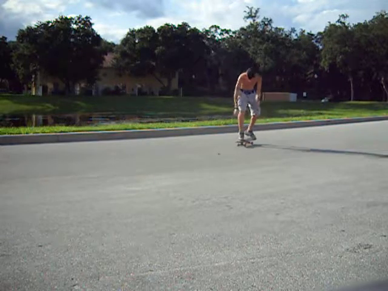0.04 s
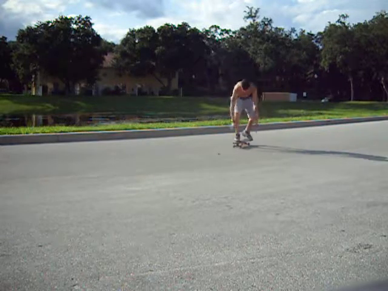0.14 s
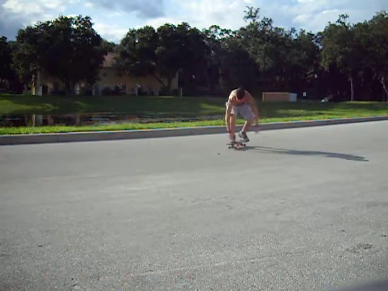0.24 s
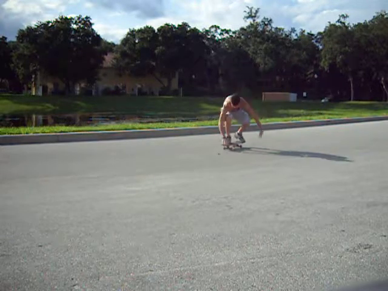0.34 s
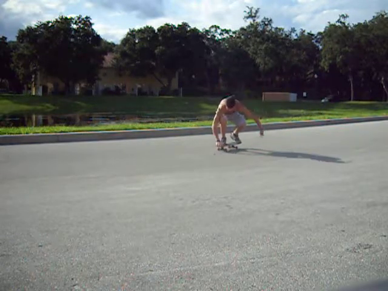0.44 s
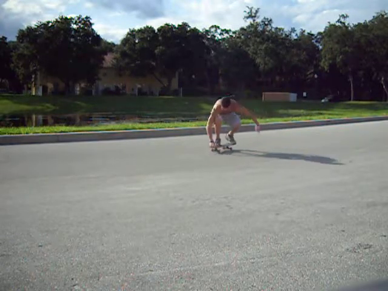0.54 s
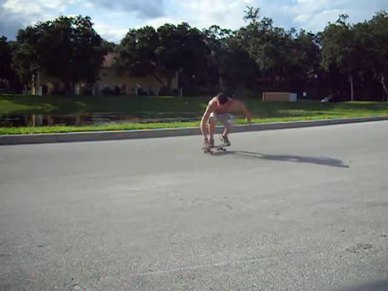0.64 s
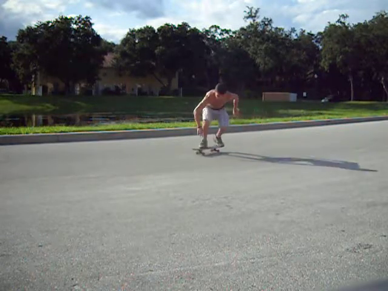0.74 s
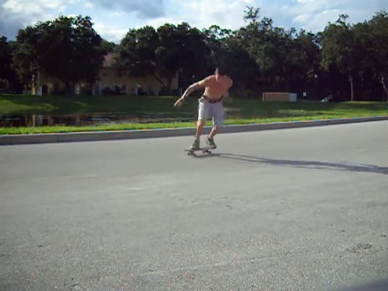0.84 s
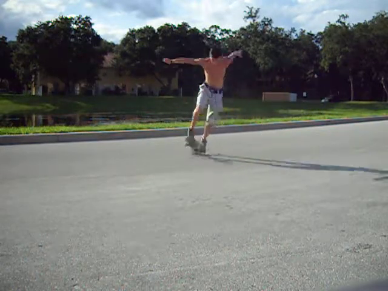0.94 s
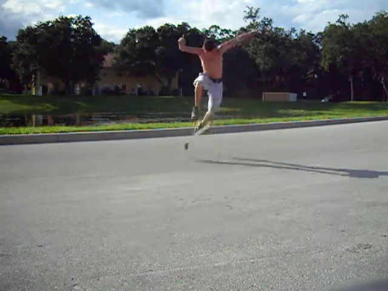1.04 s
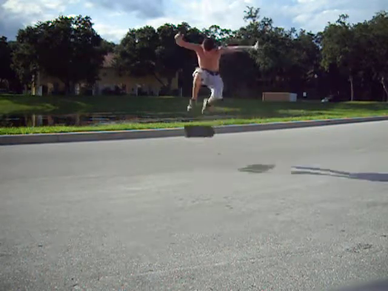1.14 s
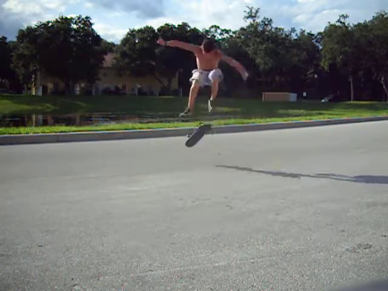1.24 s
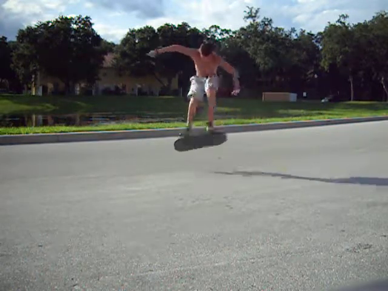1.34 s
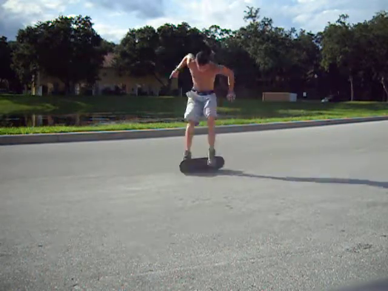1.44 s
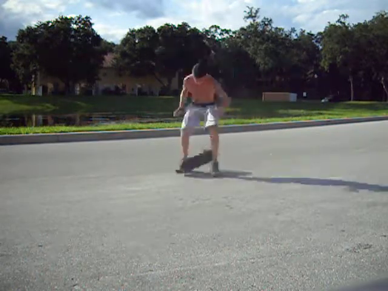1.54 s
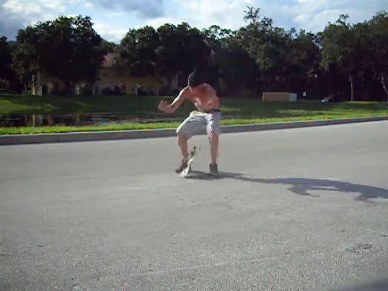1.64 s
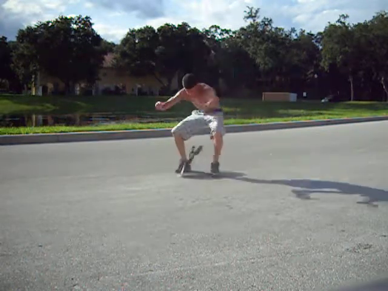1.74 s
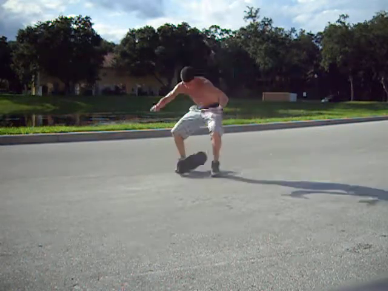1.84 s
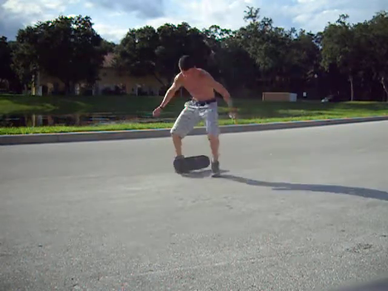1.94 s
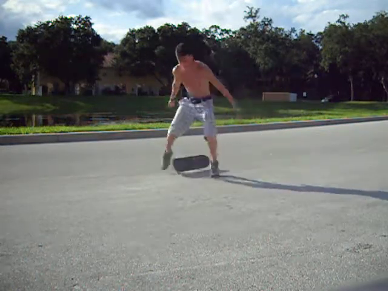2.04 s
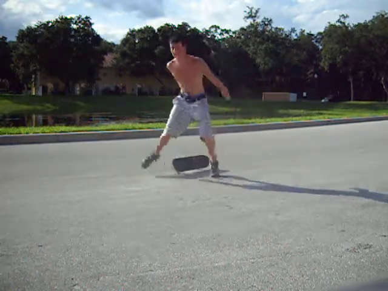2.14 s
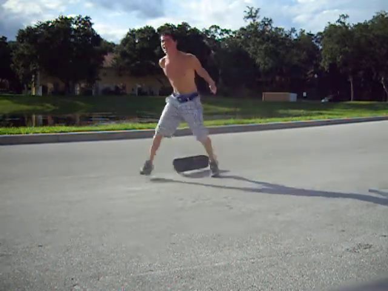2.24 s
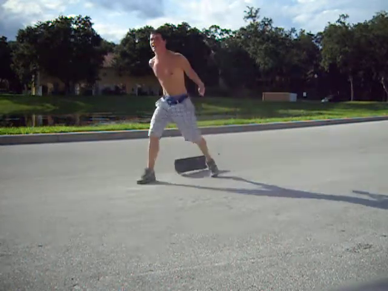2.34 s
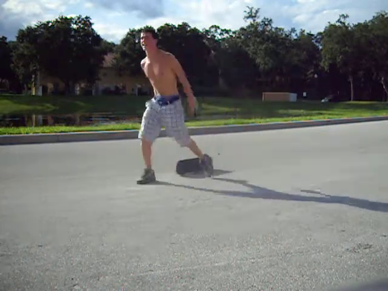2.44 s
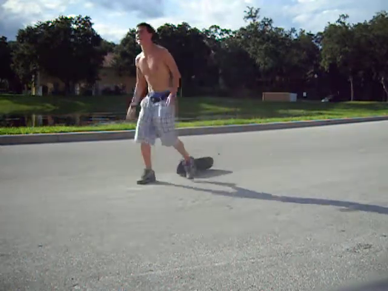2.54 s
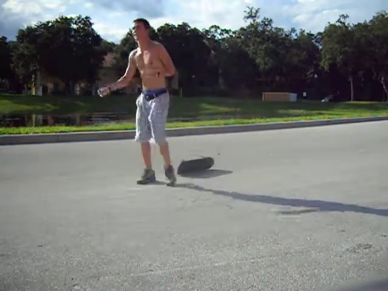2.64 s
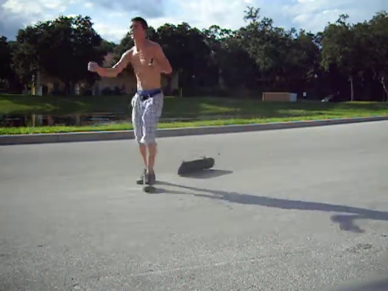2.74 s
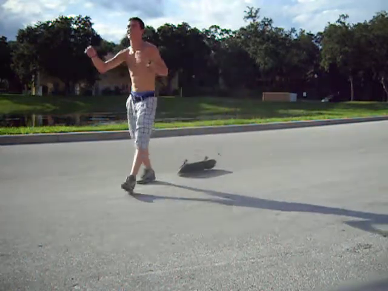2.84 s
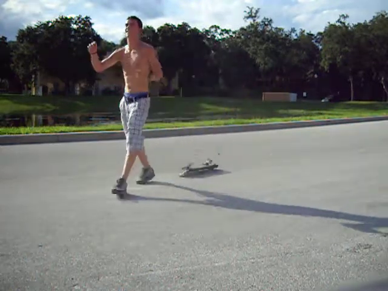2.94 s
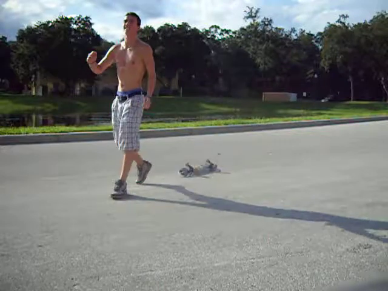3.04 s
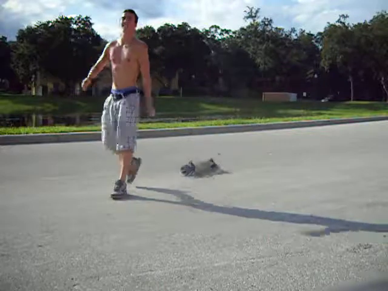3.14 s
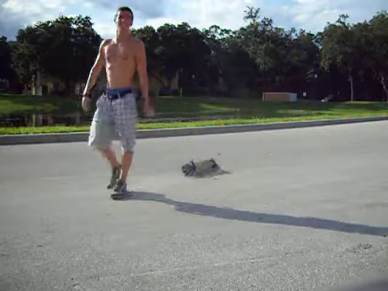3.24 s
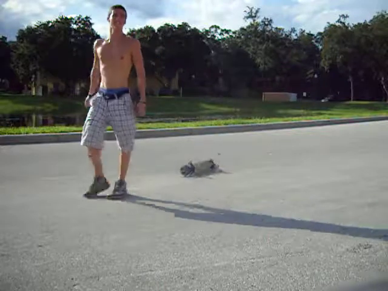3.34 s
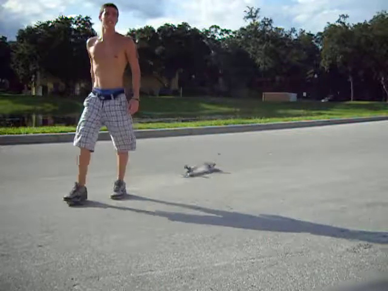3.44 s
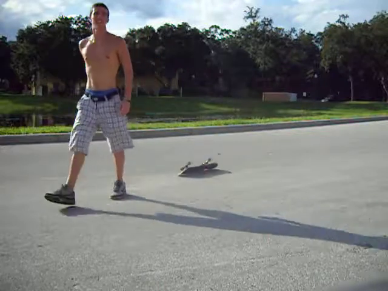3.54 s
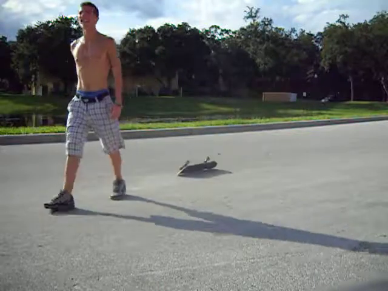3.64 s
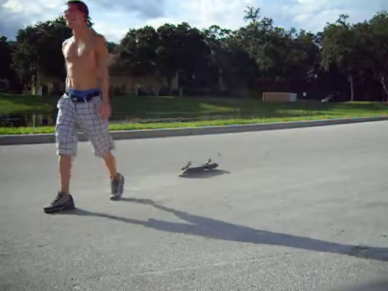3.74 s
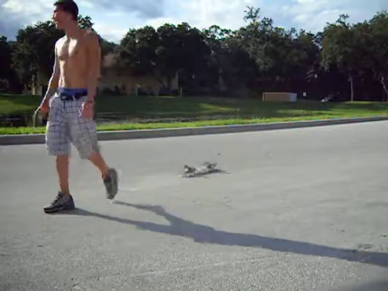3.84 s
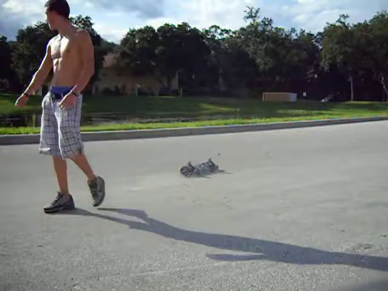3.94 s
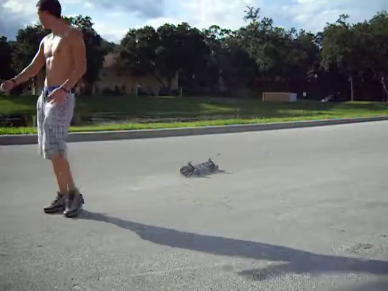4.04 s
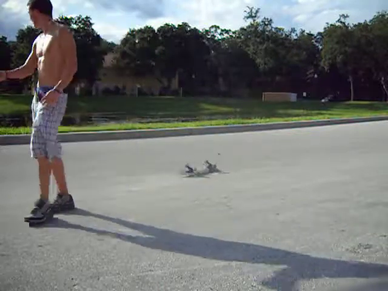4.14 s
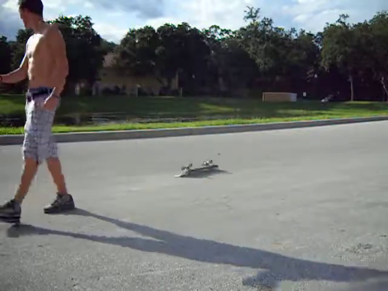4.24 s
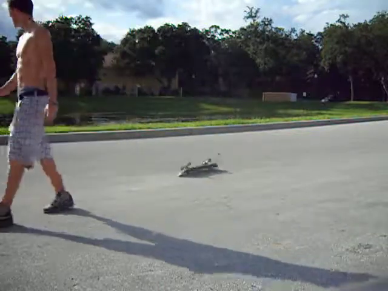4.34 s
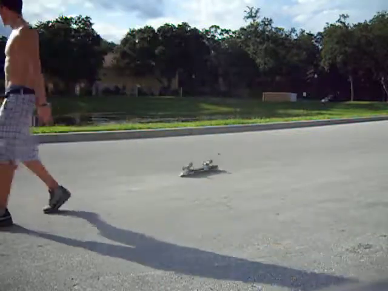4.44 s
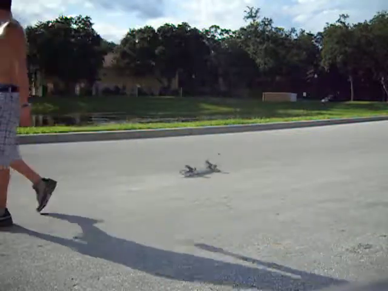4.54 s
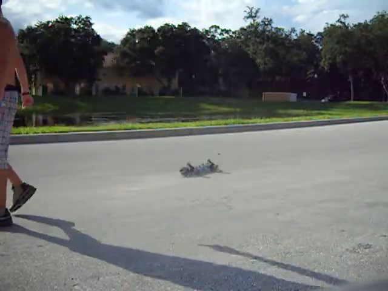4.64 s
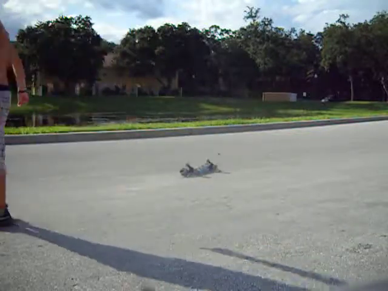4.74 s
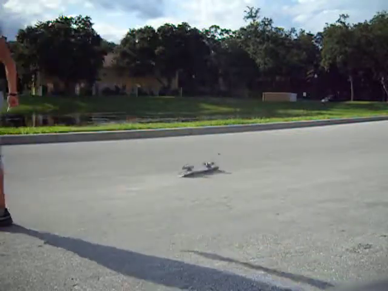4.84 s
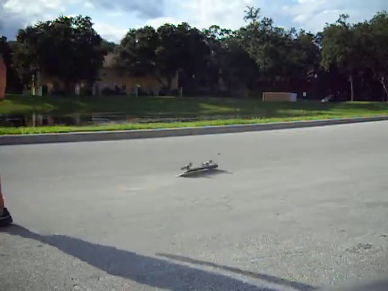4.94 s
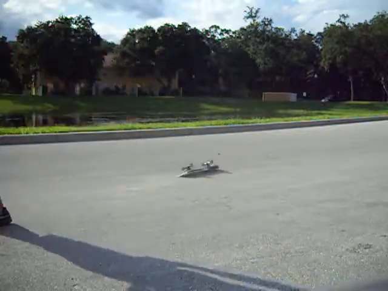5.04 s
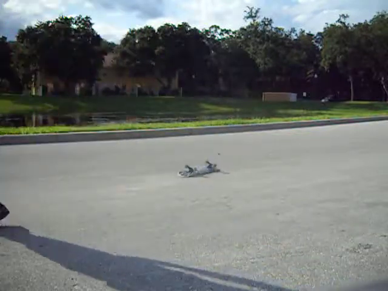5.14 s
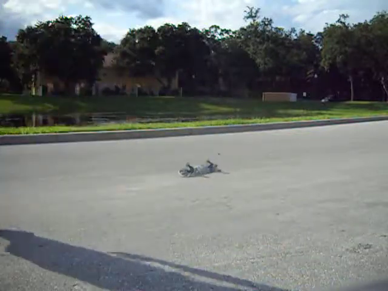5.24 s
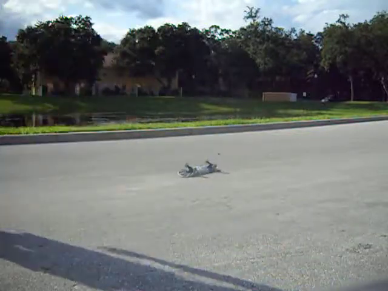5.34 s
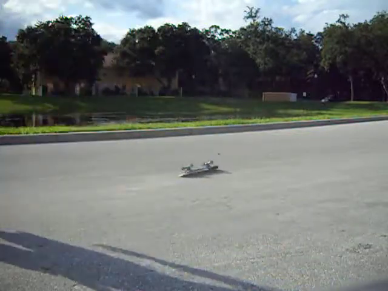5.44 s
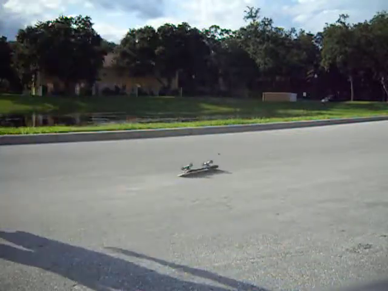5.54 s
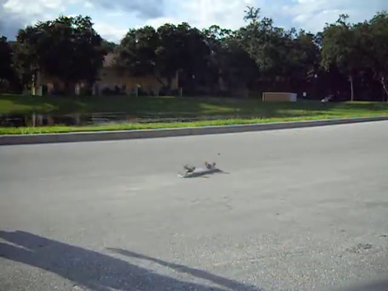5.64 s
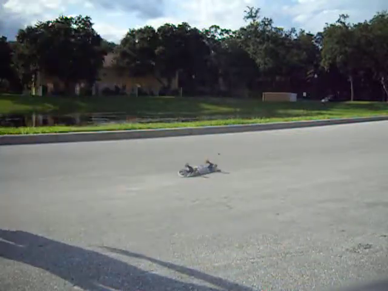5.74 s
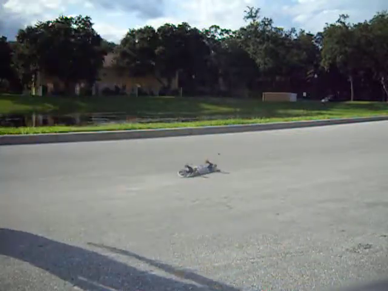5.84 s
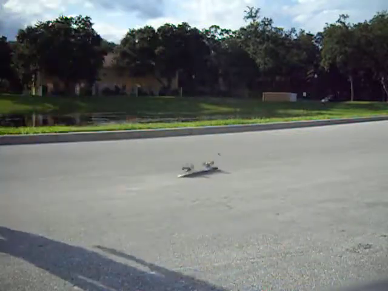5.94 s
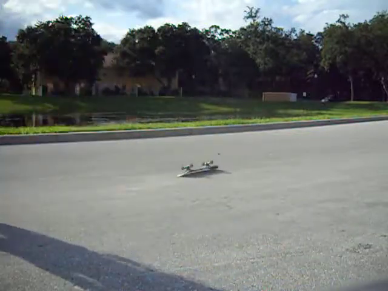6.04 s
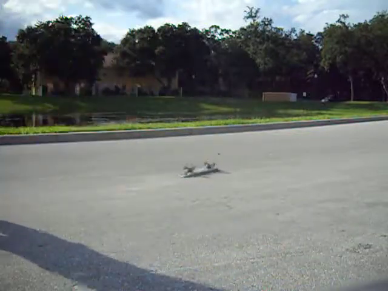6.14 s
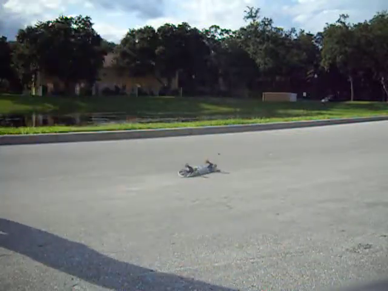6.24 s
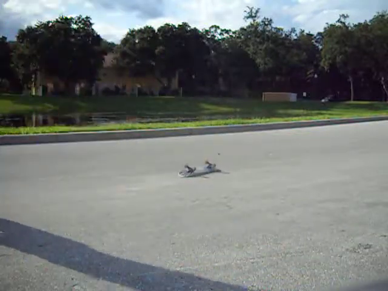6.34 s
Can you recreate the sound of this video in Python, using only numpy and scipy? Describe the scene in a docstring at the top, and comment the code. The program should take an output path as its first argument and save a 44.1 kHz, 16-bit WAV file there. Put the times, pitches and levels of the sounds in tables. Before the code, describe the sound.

Skateboard wheels roll over rough asphalt from the start, growing louder, with a few light clicks. At about 1 second the tail pops with a sharp wooden crack and the rolling stops. At 1.5 seconds the rider lands on the deck in a cluster of hard knocks, the loudest moment, overloading the microphone. The board scrapes, slaps down again near 2 seconds and rasps to rest by about 2.3. Its free wheels whirr faintly, fading out by 5 seconds. From 2.4 seconds trainers step and scuff on the gritty road, much softer than the crash, thinning out toward 6 seconds. The impacts have a faint outdoor echo. Underneath lie a quiet street wash and light wind rumble on a small microphone with little treble; a low drone like a distant engine rises slightly at about 4.7 seconds.

```python
"""A quiet suburban street. A skateboard rolls up over rough asphalt, its tail pops, and after a flip the
rider lands hard on the overturned deck, each impact exciting its modes. The board slaps down and scrapes
to rest, its wheels whirring on; he walks past in gritty trainers. Trees and houses return a faint echo.
A small camera's narrow-band microphone hears it, overloads on the big blows and catches a little wind."""
import sys
import numpy as np
from scipy import signal
from scipy.fft import rfft, irfft, next_fast_len
from scipy.io import wavfile
from scipy.ndimage import uniform_filter1d

SR = 44100
rng = np.random.default_rng(int(sys.argv[2]) if len(sys.argv) > 2 else 0)


def to_wav(s):
    """Save 16-bit WAV."""
    ch = np.atleast_2d(s).T  # columns
    pcm = np.round(np.clip(ch, -1, 1) * 32767)  # PCM
    wavfile.write(sys.argv[1], SR, pcm.astype(np.int16))


N = 281797
T = np.arange(N) / SR
SHORT = T[:SR // 3]  # time axis of one contact
TAKEOFF_S, RIDER_ON_S, RIDER_OFF_S = 1.035, 1.48, 1.63

# spectrum of sand crushed against the road: (frequency [Hz], level [dB])
GRIT_SPECTRUM = [(700, -5.5), (1200, -0.5), (1650, -7.5), (2050, 3), (2500, 2), (3100, -7), (3700, -7),
                 (4500, -15.5)]


def undb(db):
    """Decibels to amplitude ratio."""
    return 10 ** (np.asarray(db) / 20)


def unit(x):
    """Normalisation to rms 1."""
    return x / np.sqrt(np.mean(x ** 2))


def burst(x, db=0):
    """Energy normalisation: a transient gets the energy of 10 ms at this level."""
    return x * undb(db) / np.sqrt(np.sum(x ** 2) / (SR / 100))


def add(out, start_s, x):
    """Superposition of x on out, from start_s on."""
    i = int(start_s * SR)
    out[i:i + len(x)] += x[:N - i]


def butter(x, hz, kind, order=2):
    """Causal low-, high- or band-pass filtering."""
    return signal.sosfilt(signal.butter(order, hz, kind, fs=SR, output="sos"), x)


def resonate(x, hz, q):
    """Second-order resonance with gain 1 at its centre."""
    return signal.lfilter(*signal.iirpeak(hz, q, fs=SR), x)


def resonator_bank(x, modes):
    """Forced response of parallel resonances of alternating polarity, at rms 1."""
    return unit(sum((-1) ** k * undb(db) * resonate(x, hz, hz / width)
                    for k, (hz, width, db) in enumerate(modes)))


def shape(x, spectrum):
    """Zero-phase filtering by a curve of (frequency [Hz], gain [dB])."""
    hz, db = np.transpose(spectrum)
    size = next_fast_len(len(x) + SR // 20)
    f = np.arange(size // 2 + 1) * SR / size
    gain = undb(np.interp(np.log(f + 1), np.log(hz), db))
    return irfft(rfft(x, size) * gain, size)[:len(x)]


def colour(x, spectrum):
    """Spectral shaping, at rms 1."""
    return unit(shape(x, spectrum))


def wander(per_s):
    """Slow random modulation: ramps between random values, at rms 1."""
    k = int(SR / per_s)
    return unit(uniform_filter1d(np.repeat(rng.standard_normal(N // k + 1), k), k)[:N])


def grains(size, per_s, spread_db):
    """Shot noise: random tiny contacts of uneven strength."""
    hits = rng.random(size) < per_s / SR
    signs = rng.choice([-1, 1], size)
    return unit(hits * signs * undb(spread_db * np.minimum(rng.exponential(size=size), 4)))


def held(start_s, end_s, attack_s, release_s):
    """Envelope with linear attack, hold and exponential release."""
    return np.clip((T - start_s) / attack_s, 0, 1) * np.exp(-np.maximum(T - end_s, 0) / release_s)


def rise_and_decay(decay_s):
    """Double-exponential envelope of a transient."""
    return np.exp(-SHORT / decay_s) - np.exp(-4 * SHORT / decay_s)


def tone(hz, db, drift, waver_db):
    """A sinusoid under slow random frequency and amplitude modulation."""
    phase = 2 * np.pi * np.cumsum(hz * (1 + drift * wander(11))) / SR
    return np.sqrt(2) * undb(db + waver_db * wander(2.4)) * np.sin(phase)


def ambience(air_db=-46, drone_rise_s=4.65):
    """Ambient noise: a broadband wash, a faint hum and a drone like a far engine that steps up once."""
    # distant outdoor wash: (frequency [Hz], level [dB])
    air_spectrum = [(50, -17), (120, 2.5), (200, -1), (350, -4), (550, -7.5), (850, -6), (1100, -12),
                    (1500, -12.5), (2500, -16.5), (3600, -18.5), (5000, -32)]
    # partials of the hum: (frequency [Hz], level [dB])
    hum_partials = [(119, -55.5), (240, -60), (362, -63)]
    air = undb(air_db + 0.31 * wander(7)) * colour(rng.standard_normal(N), air_spectrum)
    hum = sum(tone(hz, db, drift=0.00799, waver_db=2) for hz, db in hum_partials)
    drone = tone(hz=54, db=np.where(T < drone_rise_s, -55.5, -45), drift=0.06, waver_db=1.4)
    return air + hum + drone


def wind(rumble_db=-43, gust_db=0.5):
    """Turbulence: a breeze's pressure fluctuations rumble and bump on the microphone."""
    # spectrum of the rumble: (frequency [Hz], level [dB])
    rumble_spectrum = [(15, 4), (26, 0.5), (36, 2), (51, 0.5), (70, -6.5), (100, -4), (200, -32.5)]
    # single pressure bumps: (time [s], peak level [dB], frequency [Hz])
    buffets = [(2.941, -30, 69.4), (4.718, -27.5, 30.2), (5.148, -26.5, 77), (5.399, -30, 80)]
    pressure = undb(rumble_db + gust_db * wander(1.377)) * colour(rng.standard_normal(N), rumble_spectrum)
    for time_s, db, hz in buffets:
        cycles = (T - time_s) * hz
        pressure -= undb(db) * np.cos(2 * np.pi * cycles) * np.exp(-2 * cycles ** 2)
    return pressure


def street_echo(x, scatter_db=-25, t60_s=0.76, echo_db=-27, delay_s=0.076, smear_s=0.022):
    """Reflection and scattering: trees and houses add a thin tail and one smeared echo to x."""
    # spectrum of the reflections: (frequency [Hz], level [dB])
    reflected = [(100, -7.5), (350, -2.5), (900, -0.5), (1600, -1.5), (2600, -11.5), (4000, -9.5)]
    t = T[:SR]
    tail = np.exp(-np.log(1000) * t / t60_s) * (1 - np.exp(-t / 0.0067))
    scatter = colour(rng.standard_normal(SR), reflected) * tail
    smear = (t > delay_s) * np.exp(-np.abs(t - delay_s) / smear_s)
    echo = colour(rng.standard_normal(SR), reflected) * smear
    response = (undb(scatter_db) * unit(scatter) + undb(echo_db) * unit(echo)) / np.sqrt(SR)
    return x + signal.fftconvolve(x, response)[:N]


def spinning_wheels(stop_s=5.2):
    """Free rotation: ticking balls excite the bearings' resonances, fading as friction slows the wheels."""
    # resonances of the bearings: (frequency [Hz], bandwidth [Hz], gain [dB])
    bearing_modes = [(547, 180, 3), (1956, 140, 1.5), (2460, 160, 0.5), (3570, 130, -7)]
    speed = np.clip((stop_s - T) / (stop_s - TAKEOFF_S), 0, 1)
    whirr = resonator_bank(grains(N, per_s=2700, spread_db=3.5), bearing_modes)
    return undb(-46) * speed * whirr * (T > RIDER_OFF_S)


def footsteps(onset_s=0.0031, toe_db=-7):
    """Impact and granular crushing: a rubber sole claps down, heel then forefoot, and grinds sand."""
    # footfalls, scuffs and one pebble tick:
    # (time [s], sole level [dB], grit level [dB], contact time scale [s])
    contacts = [(2.376, -41, -37, 0.011), (2.417, -34.5, -44.5, .003), (2.496, -25.5, -37.5, .016),
                (2.846, -35, -31.5, .009), (3.009, -37.5, -43, 0.0092), (3.074, -41.5, -39, .014),
                (3.127, -40, -41.5, .007), (3.164, -31.5, -39.5, .008), (3.438, -40.5, -45.5, .01),
                (3.513, -34.5, -41, 0.02), (3.599, -35.5, -43, .06), (3.905, -37, -41, .016),
                (3.954, -36, -41.5, .009), (4.081, -37, -41, .0039), (4.257, -35, -39, .015),
                (4.58, -38, -42.5, .016), (4.895, -37.5, -45.5, .012), (5.202, -43.5, -46, .008),
                (5.467, -39, -46.5, .006), (5.907, -73, -46.5, .0023), (5.986, -45.5, -49.5, .01)]
    out = np.zeros(N)
    for time_s, sole_db, grit_db, contact_s in contacts:
        sole_hz = 518 * 2 ** (-0.03 * (sole_db + 37.5))  # a heavier step flattens more rubber: lower pitch
        release = np.exp(-SHORT / (2 * contact_s) - (SHORT / (4 * contact_s)) ** 2)
        pressure = (1 - np.exp(-SHORT / onset_s)) * release
        tap = burst(signal.unit_impulse(len(SHORT)), 2) * np.exp(-contact_s / 0.01)  # brisk steps tap most
        for lag_s, part_db in [(0, 0), (1.5 * contact_s, toe_db)]:
            force = burst(pressure * grains(len(SHORT), per_s=1200, spread_db=-1)) + tap
            slap = butter(force, [300, 1050], "band")
            sole = burst(resonate(slap, sole_hz, q=3)) + burst(slap, -8)
            sand = colour(pressure * grains(len(SHORT), per_s=730, spread_db=3), GRIT_SPECTRUM)
            add(out, time_s + lag_s, burst(sole, sole_db + part_db) + burst(sand, grit_db))
    return out


def rolling_wheels(start_db=-39, nearing_db_per_s=4.5, push_s=1, push_db=10.5, lift_db_per_s=517):
    """Roughness excitation: wheels drum on asphalt, louder as they near and are pressed, silent aloft."""
    # spectrum of hard wheels on stones: (frequency [Hz], level [dB])
    wheel_spectrum = [(80, -9.5), (200, -3), (310, 4.5), (450, -2), (650, -2.5), (850, -5), (1080, -5.5),
                      (1200, -17), (1700, -25.5), (2100, -15), (2550, -15), (3000, -20.5), (3650, -18.5),
                      (4500, -30.5)]
    stones = grains(N, per_s=1500, spread_db=2.5) * undb(1.13 * wander(25))
    push = np.clip((T - push_s) / (TAKEOFF_S - push_s), 0, 1)
    lift_db = lift_db_per_s * np.maximum(T - TAKEOFF_S, 0)
    run_up = undb(start_db + nearing_db_per_s * T + push_db * push - lift_db)
    # the wheels meet the road just before the feet land
    touch = undb(-30) * held(1.411, 1.49, attack_s=0.0021, release_s=0.012)
    return colour(stones, wheel_spectrum) * (run_up + touch)


def deck_response(force, decay_s, detune=0.0027):
    """Modal synthesis: a force rings the deck's modes, which die fast and vary a little in pitch."""
    # modes of the deck with its trucks: (frequency [Hz], 60 dB decay time [s], level [dB])
    deck_modes = [(240, 0.18, -45), (324, 0.12, -13.5), (365, 0.39, 0.5), (442, 0.11, -1.5),
                  (515, 0.03, -2), (557, 0.071, 2.5), (691, 0.036, -18.5), (790, .045, -26),
                  (860.5, 0.1, -3), (909, 0.14, -4.5), (995, 0.018, 5), (1114, .04, -3.5),
                  (1252, 0.0872, -3.5), (1440, 0.054, -5), (1538, 0.064, -4.5), (1526, 0.09, -9.5),
                  (1770, .05, -26.5), (2009, 0.07, -11.5), (2256, 0.021, -11), (2290, 0.026, -3.5),
                  (2577, 0.034, -7), (2675, 0.014, -2.5), (2960, 0.0498, -24.5), (2990, 0.042, -21),
                  (3550, 0.028, 1), (3570, 0.12, -20)]
    shifts = 1 + detune * rng.standard_normal(len(deck_modes))
    ring = sum(undb(db - 60 * SHORT / t60) * np.sin(2 * np.pi * hz * shift * SHORT)
               for (hz, t60, db), shift in zip(deck_modes, shifts))
    return signal.fftconvolve(force, ring * np.exp(-SHORT / decay_s))[:len(force)]


def scraping_deck(attack_s=0.005, hiss_db=-8):
    """Stick-slip friction: the overturned deck mutters in its modes while its edge rasps on the road."""
    # slides of the deck: (time [s], duration [s], release [s], rub level [dB], rasp level [dB])
    slides = [(1.513, 0.11, .012, -19.5, -43), (1.643, 0.12, 0.038, -40, -42.5),
              (1.812, 0.18, 0.023, -38.5, -43), (2.033, .15, 0.079, -40.5, -37.5)]
    # resonances of the scraping edge: (frequency [Hz], bandwidth [Hz], gain [dB])
    edge_modes = [(900, 150, 1), (1500, 140, -3), (2050, 280, -3.5), (2510, 63, 6.5), (2900, 110, 1.5),
                  (3730, 230, -5.5)]
    rub, rasp = np.zeros((2, N))
    for time_s, duration_s, release_s, rub_db, rasp_db in slides:
        pressure = held(time_s, time_s + duration_s, attack_s, release_s)
        rub += undb(rub_db) * pressure
        rasp += undb(rasp_db) * pressure
    slips = grains(N, per_s=1300, spread_db=-0.5) * undb(2.3 * wander(44.6))
    wood = butter(deck_response(slips, decay_s=0.009), 1000, "low", order=1)
    edge = resonator_bank(slips, edge_modes) + undb(hiss_db) * colour(slips, GRIT_SPECTRUM)
    return rub * unit(wood) + rasp * edge


def board_impacts(push_s=0.0024, rattle_s=0.017):
    """Impact excitation: a short contact drives the deck with one push, a long one mostly with chatter."""
    # knocks: (time [s], body level [dB], contact pitch [Hz], crack level [dB], chatter decay [s])
    knocks = [(.301, -31.5, 506, -54, .004), (.338, -34, 800, -58.5, 0.0052),
              (0.737, -33, 600, -48, 0.0046), (0.9686, -33.5, 820, -30.5, 0.0014),
              (1.0352, -20.5, 448, -29, .004), (1.0483, -10.5, 901, -9, 0.0036),
              (1.429, -21, 650, -46, .003), (1.488, -2, 510, -8, 0.00287), (1.5036, -0.5, 459, -11, 0.0048),
              (1.511, -3, 450, -24, .0035), (1.5219, -5.5, 386, -25, .003), (1.566, -15.5, 725, -22, 0.012),
              (1.6025, -16, 413, -35.5, 0.0033), (1.6245, -19, 560, -18.5, 0.00083),
              (1.9205, -23, 564, -29.5, 0.01), (1.9555, -11, 548, -18.5, .0016),
              (1.996, -24.5, 600, -33.5, 0.0098), (2.0216, -19.5, 650, -41, 0.0054)]
    out = np.zeros(N)
    for time_s, body_db, contact_hz, crack_db, chatter_s in knocks:
        # under the rider the deck rings longer, and his weight adds thump
        loaded = RIDER_ON_S < time_s < RIDER_OFF_S
        decay_s, thump_db = (0.025, -16.5) if loaded else (0.007, -25.5)
        chatter = rng.standard_normal(len(SHORT)) * rise_and_decay(chatter_s)
        push = burst(signal.unit_impulse(len(SHORT)), 6) * np.exp(-chatter_s / push_s)
        force = push + burst(chatter)
        rattle = grains(len(SHORT), per_s=400, spread_db=-1.5) * rise_and_decay(rattle_s)
        wood = deck_response(force, decay_s)
        # soles, wheels and loose, rattling trucks fill the gaps between the deck's modes
        fill = burst(butter(force, [280, 2500], "band"), -6)
        fill += burst(butter(rattle, [280, 2500], "band"), -5)
        body = resonate(burst(wood) + fill, contact_hz, q=1)
        # the hard edge of the contact radiates directly, beside the high modes
        crack = burst(butter(wood, [1750, 3100], "band", order=3))
        crack += burst(butter(force, [1200, 3500], "band"), -11)
        thump = butter(butter(force, 190, "low", order=3), 80, "high", order=1)
        add(out, time_s, burst(body, body_db) + burst(crack, crack_db) + burst(thump, body_db + thump_db))
    return out


def scene():
    """Superposition: board and rider, with their echo, over the ambience and wind."""
    direct = board_impacts() + rolling_wheels() + scraping_deck() + spinning_wheels() + footsteps()
    return (street_echo(direct) + ambience() + wind())[None]


def record(dry):
    """Band limiting and overload: the microphone loses treble, loud blows clip, a low-pass follows."""
    # frequency response of the microphone channel: (frequency [Hz], gain [dB])
    mic_response = [(300, -1.5), (540, 0), (620, -3), (710, -2.5), (830, -0.5), (1480, -3), (1720, -6),
                    (1950, -4), (3000, -3.5), (3680, -3.5), (3850, -7), (4000, -17), (4250, -14),
                    (4450, -26), (4800, -63.5)]
    clipped = np.clip(shape(dry[0], mic_response), -0.7, 0.7)
    low_pass = signal.ellip(8, 0.2, 70, 16300, fs=SR, output="sos")
    return signal.sosfilt(low_pass, clipped)[None]


dry = scene()
out = record(dry)
to_wav(out)
```